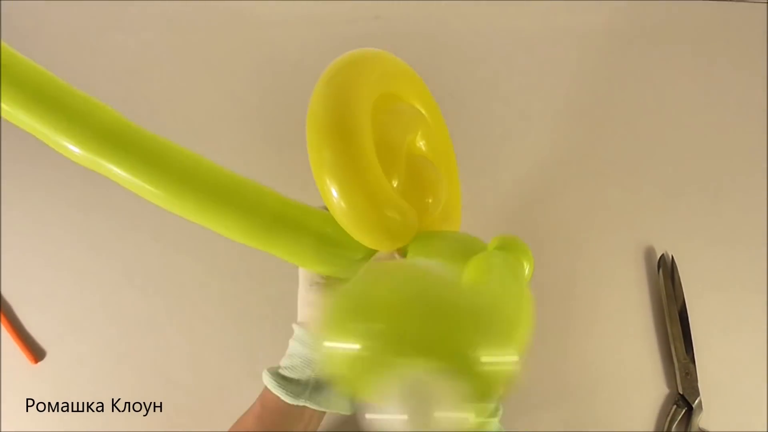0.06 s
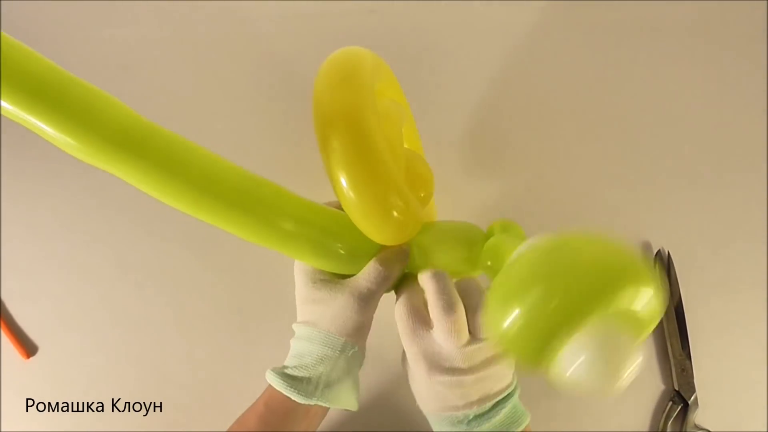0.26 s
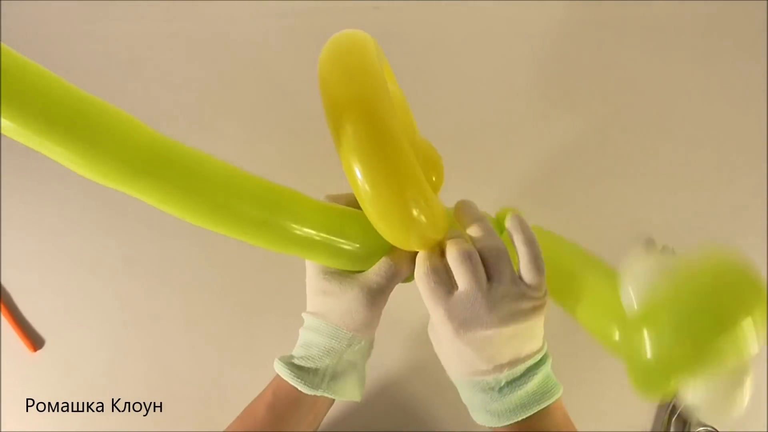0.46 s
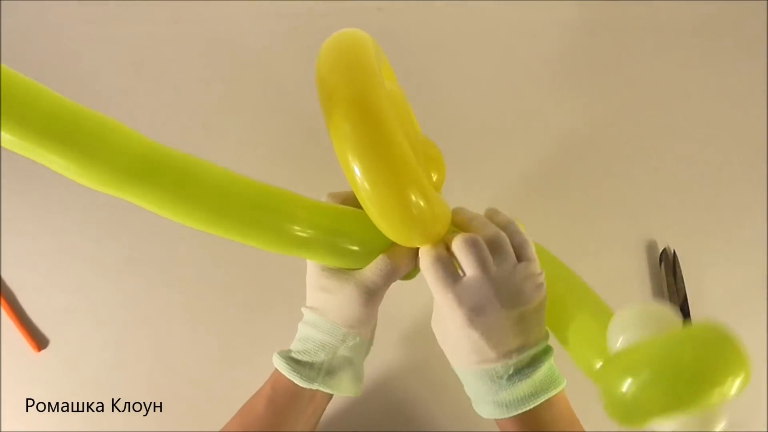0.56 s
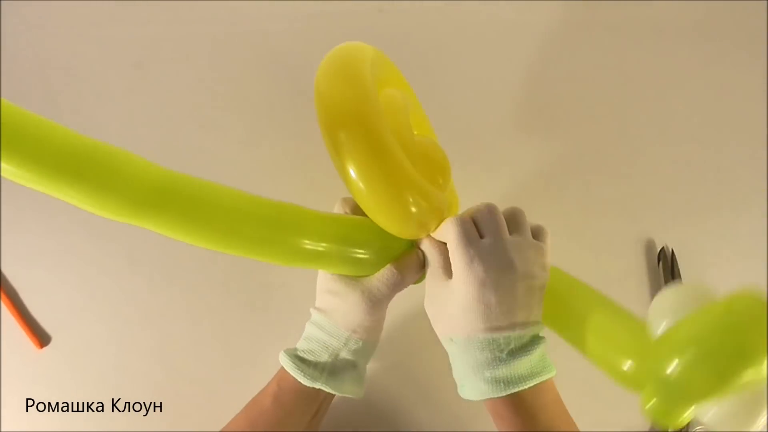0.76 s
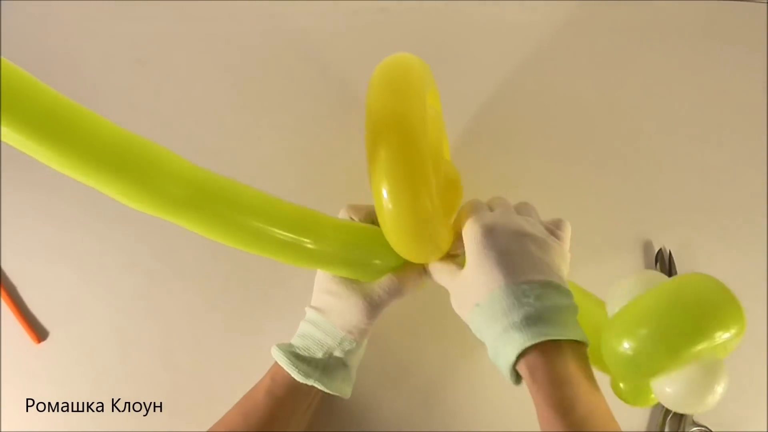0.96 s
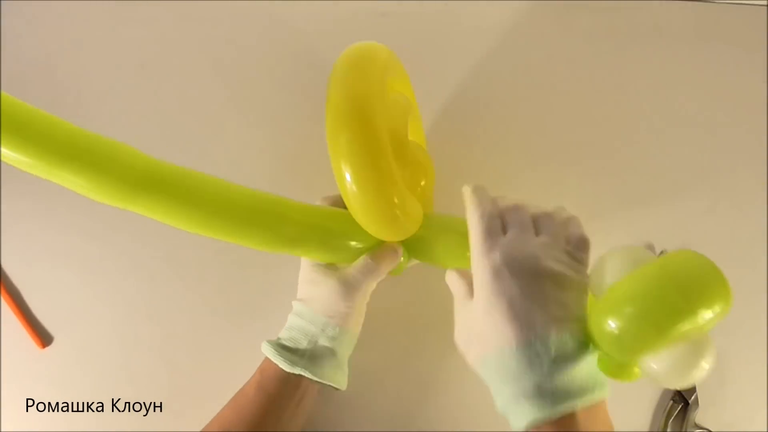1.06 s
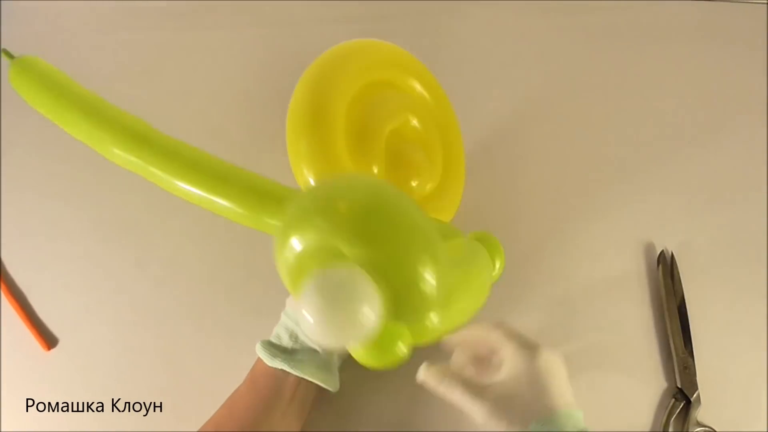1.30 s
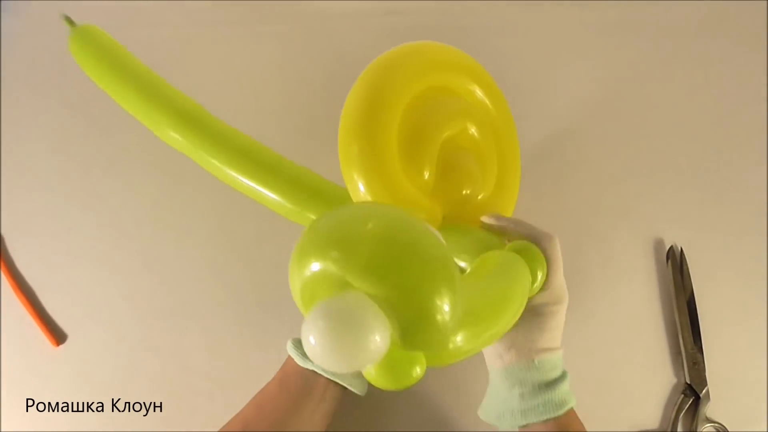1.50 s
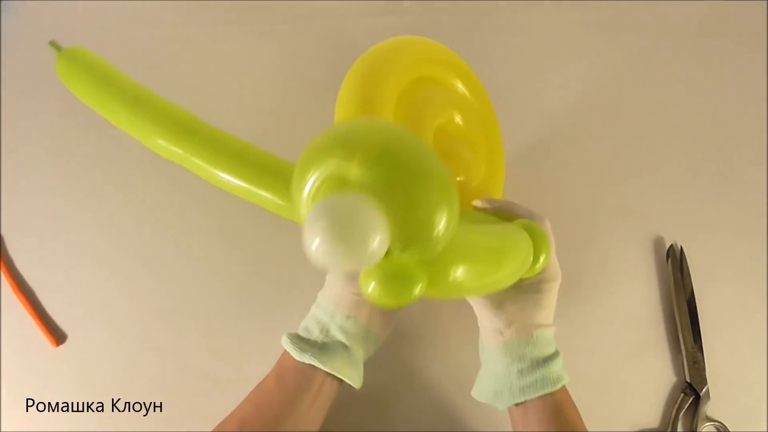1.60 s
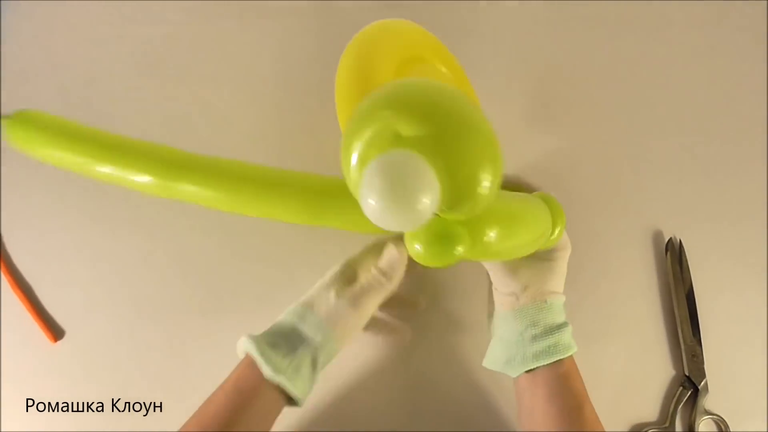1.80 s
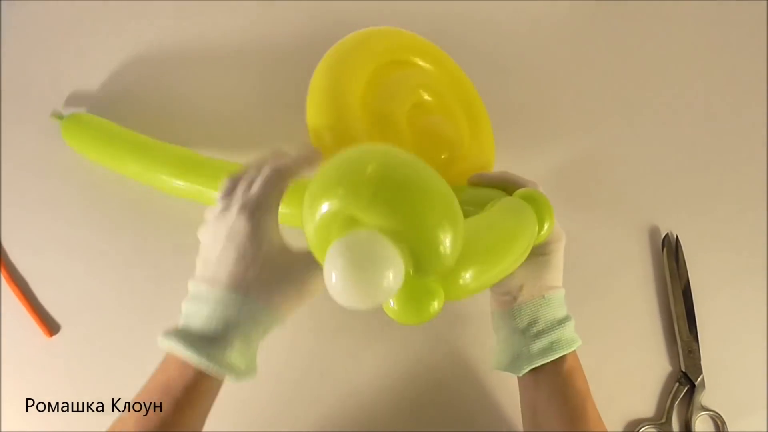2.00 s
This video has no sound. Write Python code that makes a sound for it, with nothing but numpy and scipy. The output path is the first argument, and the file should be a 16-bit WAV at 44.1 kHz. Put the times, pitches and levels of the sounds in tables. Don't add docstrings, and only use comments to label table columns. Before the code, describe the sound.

Balloon twisting up close: sharp rubbery snaps, squeaky ticks, hollow pops and soft glove rubbing

```python
import sys
import numpy as np
from scipy import signal
from scipy.fft import rfft, irfft
from scipy.io import wavfile
from scipy.ndimage import uniform_filter1d

SR = 44100
rng = np.random.default_rng(int(sys.argv[2]) if len(sys.argv) > 2 else 0)


def output_pcm(signal):
    pcm = np.clip(np.atleast_2d(signal).T, -1, 1) * 32767
    wavfile.write(sys.argv[1], SR, np.round(pcm).astype(np.int16))


def ratio(d):
    e = np.asarray(d, float) / 20
    return 10 ** e


N = 90404

SLIP_LAG_S = 0.0006
FLICKER_DB = 1.6


def band(x, hz, width_hz):
    hz = min(hz, 0.45 * SR)
    sharpness = np.clip(hz / width_hz, 0.4, 80)
    return signal.lfilter(*signal.iirpeak(hz, sharpness, fs=SR), x)


def lowpass(x, hz):
    return signal.lfilter(*signal.butter(2, hz, fs=SR), x)


def unit(x):
    return x / np.sqrt(np.mean(x ** 2))


def shaped(x, shape):
    hz, db = np.array(shape).T
    f = np.maximum(np.arange(N // 2 + 1) * SR / N, 1)
    return irfft(rfft(x) * ratio(np.interp(np.log(f), np.log(hz), db)), N)


def coloured(shape):
    return unit(shaped(rng.standard_normal((2, N)), shape))


def walk(rate):
    k = int(SR / rate)
    steps = np.repeat(rng.standard_normal(N // k + 1), k)
    return unit(uniform_filter1d(steps, k)[:N])


def mid_side(side_db):
    return np.array([[1], [ratio(side_db)]])


def add(out, s, sound, db):
    i = max(int(s * SR), 0)
    part = sound[:N - i]
    out[..., i:i + part.shape[-1]] += part * ratio(db) / np.abs(sound).max()


def hum():
    # frequency in Hz, level in dB.
    tone = [(15, -41), (25, 8.5), (510, 6), (669, -23), (1640, -30), (2600, -28), (6730, -29), (14400, -43),
            (16500, -45)]
    return coloured(tone) * ratio(-68.5) * mid_side(-6)


def room(x):
    # band centre in Hz, time to fade by 60 dB in seconds, level in dB.
    tails = [(197, 0.2, -15), (450, 0.24, -4.5), (880, 0.13, -4.5), (1850, 0.18, -6), (5240, 0.17, -11.5),
             (9100, 0.051, -20)]
    gap_ms, scatter, flutter_per_s = 1.9, 0.85, 260
    t = np.arange(SR // 2) / SR
    swell = np.clip(t * 1000 / gap_ms, 0, 1) ** 2
    out = 0
    for hz, t60, db in tails:
        for half in range(2):
            noise = rng.standard_normal((2, len(t)))
            noise = band(band(noise, hz, 0.77 * hz), hz, 0.77 * hz)
            fade = noise * ratio(-60 * t / t60)
            tail = ratio(db) * fade * np.sqrt(2 * hz / SR / np.sum(fade ** 2)) * swell
            flutter = np.sqrt(1 - scatter ** 2) + scatter * walk(flutter_per_s)
            out = out + signal.fftconvolve(x[None], tail, axes=1)[:, :N] * flutter
    return out * mid_side(-9.5)


def glove_hiss():
    # time in seconds, hiss level in dB, boost of the highest treble in dB.
    strokes = [(0, -49.5, -28), (.1, -54.5, 5.5), (0.26, -55, 11), (0.291, -61.5, -0.5), (.34, -58, 4),
               (.45, -52, 0), (.52, -53.5, -2), (.8, -64.5, 1.5),        (1.22, -56, -0.5), (1.38, -65, -9),
               (1.5, -66, -4), (1.56, -52, -8), (1.619, -48.5, -0.5), (1.67, -54, -1), (1.76, -53.5, -3.5),
               (1.84, -54, 6.5), (1.95, -69.5, -3), (2.05, -67.5, 3)]
    # frequency in Hz, level in dB.
    glove = [(1180, 1.5), (2000, -0.5), (2900, -2), (5400, 2.5), (8500, -0.5), (12200, -7), (15600, -10),
             (16500, -37)]
    t = np.arange(N) / SR
    s, hiss_db, sheen_db = np.array(strokes).T
    hiss = coloured(glove) * ratio(FLICKER_DB * walk(26.47) + 1.33 * walk(500))
    air = band(hiss, 17800, 12400)
    sheen = (ratio(np.interp(t, s, sheen_db)) - 1) * air
    return (unit(hiss) + sheen) * mid_side(-11.5) * ratio(np.interp(t, s, hiss_db) + 0.5)


def drag_rumble():
    # time in seconds, rumble level in dB.
    drag = [(0, -56), (.15, -56), (.26, -56.5), (.31, -64), (.45, -50.5), (.62, -57), (.84, -67),
            (.98, -58.5), (1.04, -55), (1.18, -58), (1.23, -58.5), (1.4, -63), (1.5, -61.5), (1.58, -62),
            (1.8, -58), (1.96, -68), (2.05, -72)]
    # resonance in Hz, its width in Hz, level in dB.
    chambers = [(595.4, 23, 16), (780, 380, 12), (950, 17, -13), (925, 250, 1.5), (1060, 430, 14),
                (1384, 92, 17), (1630, 250, 12.5), (2130, 320, 9.5)]
    t = np.arange(N) / SR
    shake = rng.standard_normal((2, N)) * ratio(FLICKER_DB * walk(30.73) + 1.66 * walk(200))
    skin = band(shake, 660, 790)
    rumble = 0
    for k, (hz, width_hz, db) in enumerate(chambers):
        rumble = rumble + (-1) ** k * ratio(db) * band(skin, hz, width_hz)
    table = unit(band(band(shake, 223, 330), 223, 330))
    rumble = unit(rumble) + ratio(-11.5) * table
    return rumble * mid_side(-7) * ratio(np.interp(t, *np.array(drag).T) + 1)


def thumps():
    # start in seconds, level in dB, pitch in Hz, length in cycles.
    pushes = [(0.007, -31.5, 450, 0.84), (0.18, -37.5, 248, 1.9), (0.218, -31.5, 363, 0.98),
              (0.322, -35.5, 302, 0.75), (0.329, -35, 191, 0.95), (0.449, -37, 265, 1.8),
              (0.451, -48, 84.5, 0.7), (0.542, -20, 154, 0.6), (0.668, -36.5, 206, 0.87),
              (0.703, -31, 294, 1.2), (0.887, -42, 267, 3.6), (1.02, -40, 540, 4), (1.045, -24.5, 567, 2.1),
              (1.048, -41, 352, 2.4), (1.182, -51, 234, 1.7), (1.523, -37, 450, 1.4),
              (1.536, -26, 510, 1.5), (1.61, -40.5, 288, 2.5), (1.711, -32.5, 548, 2.4),
              (1.866, -37.5, 237, 2.3), (2.043, -33, 318, 0.34)]
    out, t = np.zeros(N), np.arange(6000) / SR
    for s, db, hz, cycles in pushes:
        u = t * hz / max(cycles, 0.3) * 3
        rub = unit(band(band(rng.standard_normal(len(t)), hz, hz), hz, hz))
        push = np.sin(2 * np.pi * hz * t) * np.exp(-u)
        push = push + 0.28 * rub * np.exp(-u / 3.53) / 3
        add(out, s, push * u, db - 5.5)
    return out


def pops():
    # start in seconds, level in dB, pitch in Hz, ring in ms.
    chamber_pops = [(.203, -36.5, 910, 7.1), (.217, -38.5, 1440, 3.6), (0.3674, -26, 740, 6.1),
                    (0.37, -35.5, 1330, 4), (.446, -45, 925, 5.9), (.5435, -26, 1116, 3.4),
                    (.544, -29, 620, 2.6), (.552, -41, 1060, 19), (.693, -36.5, 1010, 6.8),
                    (.7046, -12.5, 880, 2.26), (.715, -37.5, 800, 4), (.726, -36, 880, 4.2),
                    (0.737, -41, 900, 6), (.884, -35, 787, 4.2), (1.0454, -23.5, 1323, 2.5),
                    (1.056, -33, 927, 7.7), (1.1005, -32, 794, 8), (1.1068, -25.5, 809, 8.2),
                    (1.126, -48, 816, 2.9), (1.1995, -44.5, 1040, 4.3), (1.228, -48, 1060, 7.3),
                    (1.252, -52, 1014, 5.7), (1.428, -46, 693, 7), (1.534, -30, 889, 5.1),
                    (1.541, -40.5, 830, 4), (1.558, -44, 800, 5.7), (1.711, -30.5, 1150, 3)]
    rise_ms, octave_full_ms = 0.59, 9
    out, t = np.zeros(N), np.arange(4000) / SR
    for s, db, hz, ms in chamber_pops:
        fade = (1 - np.exp(-t * 1000 / rise_ms)) * np.exp(-(t * 1000 / max(ms, 1)) ** 2)
        turn = 2 * np.pi * hz * t
        neighbour = ratio(-16) * np.sin(1.084 * turn)
        octave = ratio(-12) * min(ms / octave_full_ms, 1) ** 2 * np.sin(2 * turn)
        add(out, s + SLIP_LAG_S, (np.sin(turn) + neighbour + octave) * fade, db + 2.5)
    return out


def pings():
    # start in seconds, level in dB, pitch in Hz, ring in ms.
    patches = [(.1755, -35.5, 7060, 2), (0.2026, -30, 5560, 2.7), (.2155, -30.5, 5450, 3),
               (0.4198, -29.5, 8740, 1.3), (.4195, -35, 5800, 2.4), (.4284, -45, 8300, 2),
               (0.542, -16.5, 3780, 2.5), (0.5426, -38, 7400, 2), (.668, -16, 5800, 1.3),
               (.7045, -18, 5240, 0.76), (0.7145, -37, 4000, 2.3), (0.8844, -25, 7650, 0.67),
               (1.0452, -32, 7220, 2.6), (1.099, -35.5, 3750, 4.6), (1.1052, -34, 3740, 3.9),
               (1.3028, -40.5, 6000, 1.9), (1.6094, -33, 5540, 2), (1.656, -34, 6460, 1.6),
               (1.71, -24.5, 8000, 0.8), (1.711, -25, 4500, 1.4), (1.8082, -37, 8500, 2.9)]
    width_hz = 780
    out, t = np.zeros(N), np.arange(900) / SR * 1000
    for s, db, hz, ms in patches:
        rub = rng.standard_normal(len(t)) * np.exp(-(t / max(ms, 0.4)) ** 2)
        add(out, s, band(band(rub, hz, width_hz), hz, width_hz), db)
    return out


def snaps():
    # start in seconds, level in dB, length in ms, level of the dull body in dB, top in kHz.
    strong = [(0.203, -29, 5.7, -0.5, 8.2), (0.214, -22, 2.9, -10, 5.7), (0.4186, -21, 2.86, -13.5, 9.5),
              (0.5416, -10.5, 3.7, 0.5, 10.8), (0.6672, -11, 2.9, -9.5, 12.5), (0.6997, -21.5, 3, -1.5, 16),
              (0.7032, -15, 2.5, 2.5, 11.4), (0.8837, -27, 1.47, -2.5, 19.6), (1.0437, -26, 6, 4.5, 8.2),
              (1.043, -21.5, 1.9, -18, 10.6), (1.0993, -35, 1.5, 4, 12), (1.1054, -35, 17, 2, 7.6),
              (1.5336, -29, 1.56, -14, 9.9), (1.609, -31, 3.4, -23, 12), (1.7103, -15.5, 3.05, -5.5, 20.4)]
    # start in seconds, level in dB, length in ms, dull body in dB, top in kHz.
    light = [(0.176, -32, 2.7, -3, 11), (0.323, -48, 1.2, -5, 7), (0.366, -34.5, 4.7, 7.5, 15.4),
             (0.394, -42, 2.6, -10, 17), (0.429, -43, 1.5, -20, 12), (0.6157, -40, 1.9, 6.5, 6.3),
             (0.635, -35.5, 1.8, -46, 13), (0.6613, -32.5, 3.8, -22, 8.6), (0.7155, -31, 2.1, -19, 14),
             (0.778, -52, 0.9, 12, 10), (1.0914, -41, 4.3, 5, 7.2), (1.1995, -39.5, 1.1, -25, 11),
             (1.2494, -43.5, 3, -13, 9), (1.2847, -39, 1.6, -14, 17), (1.3004, -40, 0.66, -5, 23),
             (1.4247, -39, 4.9, -0.5, 8.1), (1.515, -45, 1.5, -10, 21), (1.563, -46, 4.5, -17, 10),
             (1.6552, -32.5, 1.7, -19, 16), (1.777, -52, 1.9, -14, 12), (1.8074, -31.5, 3.5, -17, 12.4),
             (2.005, -45, 5.4, -9, 10), (2.0434, -39.5, 2.2, -4, 8.1)]
    # skin resonance in Hz, its width in Hz, level in dB.
    latex = [(4380, 2600, 1.5), (5800, 500, -3.5), (7700, 850, 6.5)]
    rise_share, narrowest_hz = 0.18, 1100
    dull_hz, dull_width_hz = 1358, 2260
    out, t = np.zeros(N), np.arange(5000) / SR * 1000
    for s, db, ms, dull_db, top_khz in strong + light:
        ms = max(ms, 0.3)
        sign, size = rng.standard_normal((2, len(t)))
        slips = sign * ratio(2.5 * size) * np.clip(t / ms / rise_share, 0, 1)
        burst = np.exp(-(t / ms) ** 3)
        fizz_tail = slips * ratio(-6.5) * np.exp(-t / 9.4)
        fizz = slips * burst + lowpass(fizz_tail, 8500)
        body = slips * (burst + ratio(-14.5) * np.exp(-t / 14.9))

        bright = ratio(7.5) * band(fizz, 9300, 15000)
        for hz, width_hz, gain_db in latex:
            detuned = hz * (1 + 0.046 * rng.standard_normal())
            bright = bright + ratio(gain_db) * band(fizz, detuned, max(width_hz, narrowest_hz))
        bright = lowpass(bright, np.clip(top_khz, 3, 20) * 1000)
        dull = band(band(body, dull_hz, dull_width_hz), dull_hz, dull_width_hz)
        add(out, s + SLIP_LAG_S, bright, db - 1.5)
        add(out, s + SLIP_LAG_S, dull, db - 1.5 + dull_db)
    return out


def scene():
    # frequency in Hz, level of the side in dB.
    width = [(60, 3.5), (350, 4), (800, -1), (1800, -3), (3000, 2.5), (6000, -4.5), (10000, 9), (15000, 5)]
    pushes = thumps()
    hits = snaps() + pings() + pops() + pushes
    across = ratio(-16.5) * (np.roll(hits, shift=-2) - np.roll(hits, shift=2))
    lean = -0.6
    across = across + ratio(-13.5) * np.roll(pushes, shift=-20) * lean
    mid, side = np.array([hits, across]) + glove_hiss() + drag_rumble() + hum() + room(hits)
    side = shaped(side, width)
    return np.array([mid + side, mid - side])


def roll_off(x):
    return signal.sosfilt(signal.butter(12, 16990, fs=SR, output="sos"), x)


def record(dry):
    limit = 0.6
    rounded = limit * np.tanh(dry / limit)
    no_bass = signal.sosfilt(signal.butter(2, 55, "highpass", fs=SR, output="sos"), rounded)
    mix = signal.sosfilt(signal.butter(10, 16000, fs=SR, output="sos"), no_bass)
    return roll_off(mix)


dry = scene()
out = record(dry)
output_pcm(out)
```